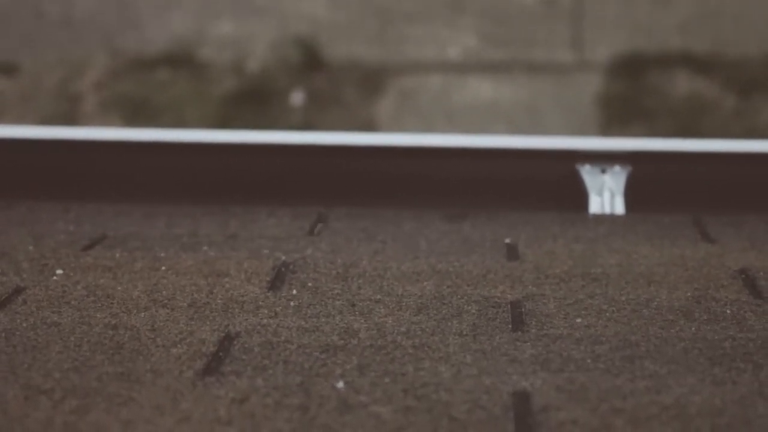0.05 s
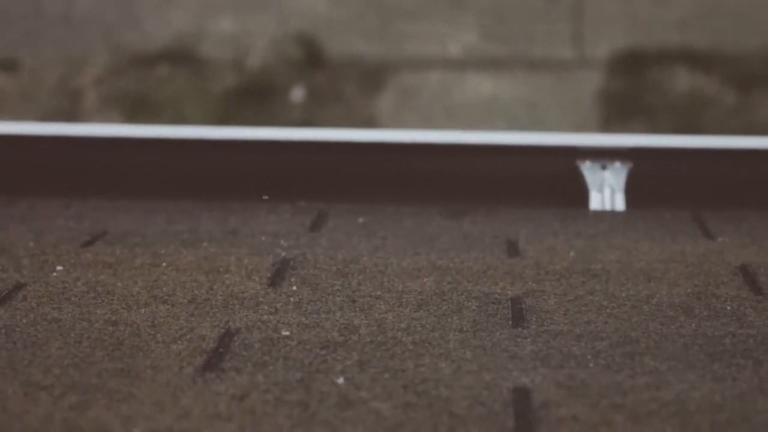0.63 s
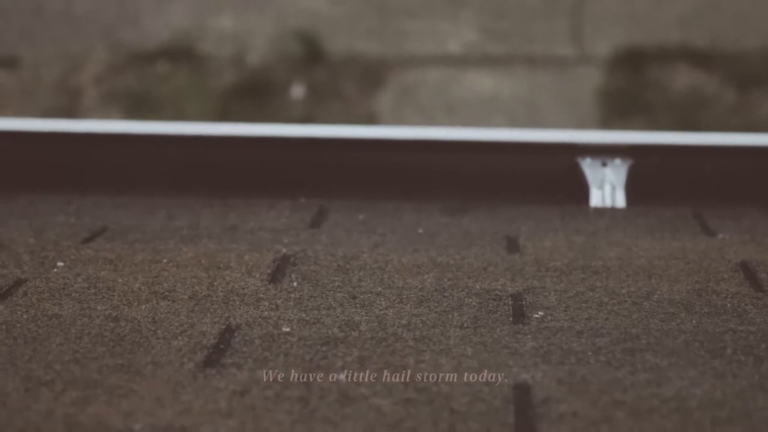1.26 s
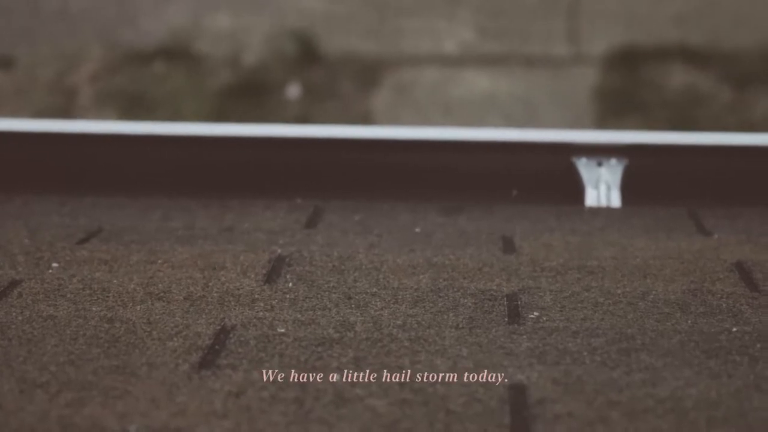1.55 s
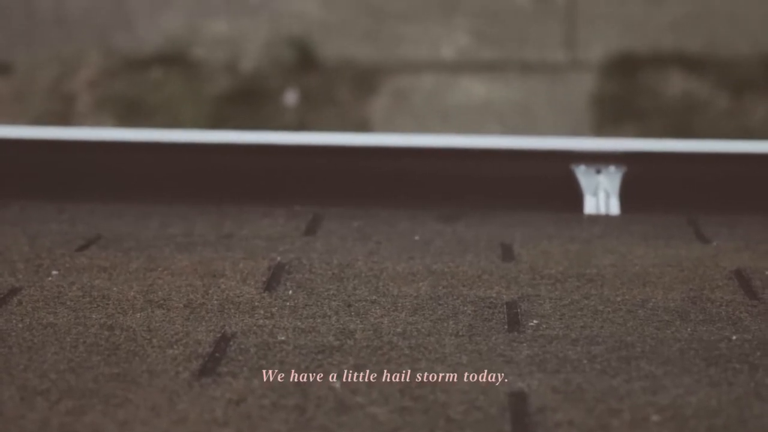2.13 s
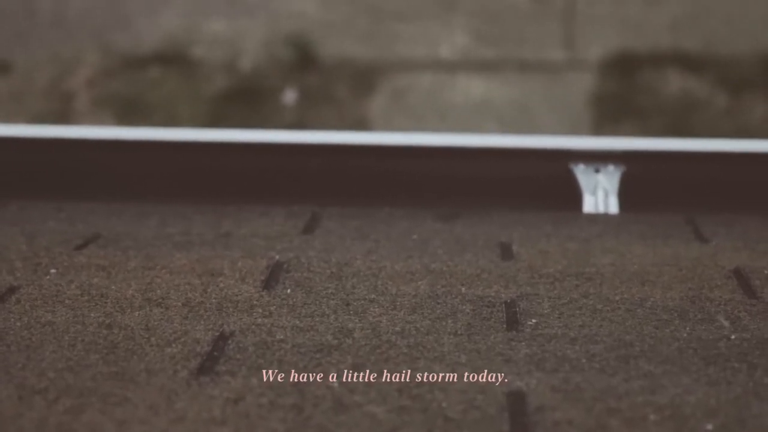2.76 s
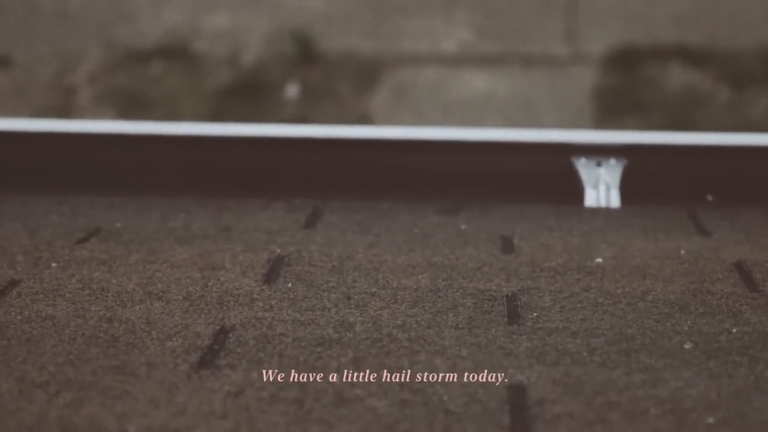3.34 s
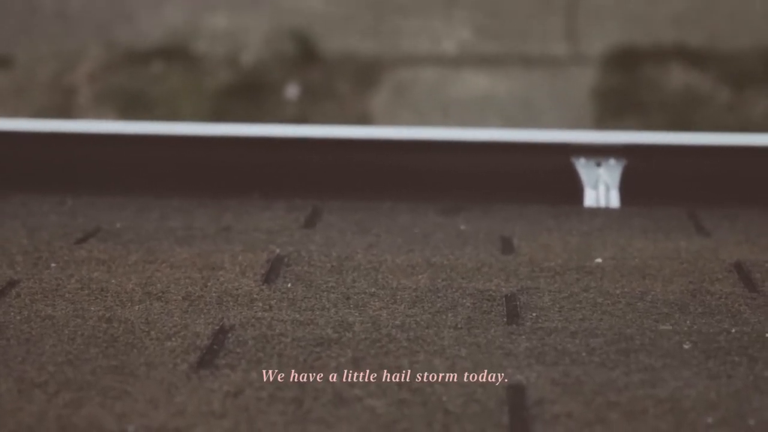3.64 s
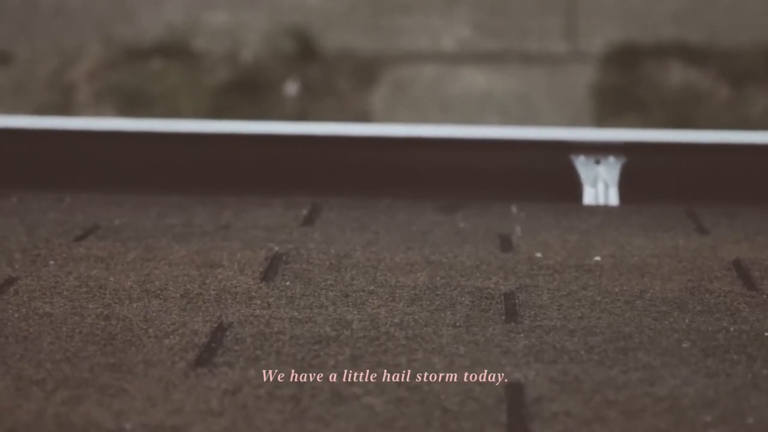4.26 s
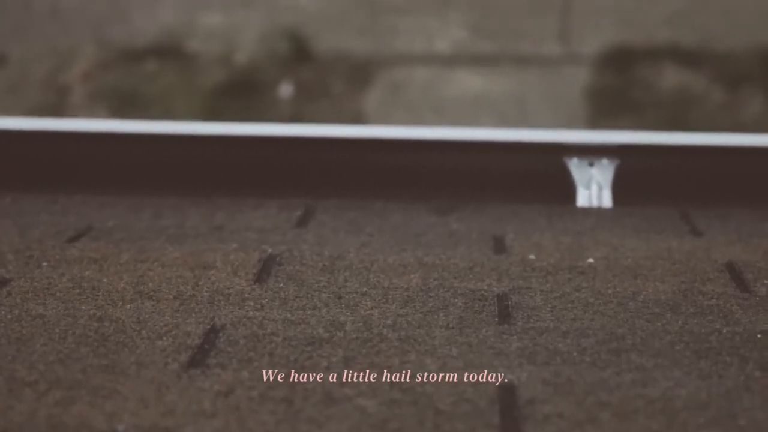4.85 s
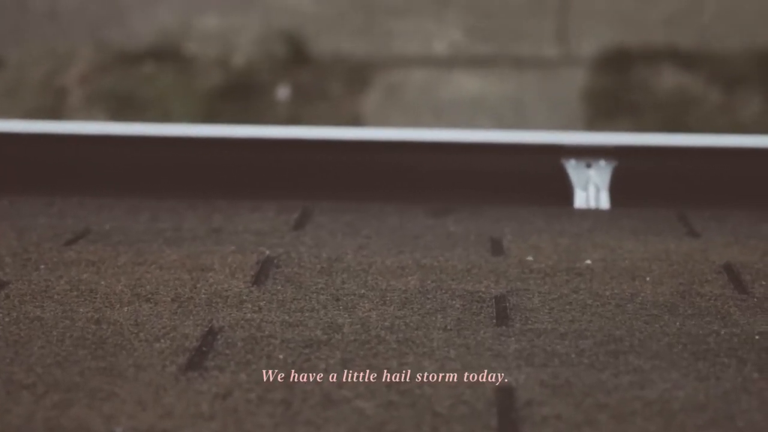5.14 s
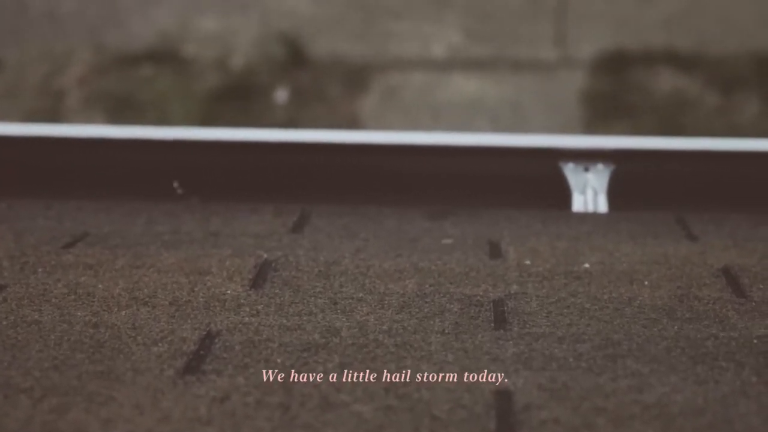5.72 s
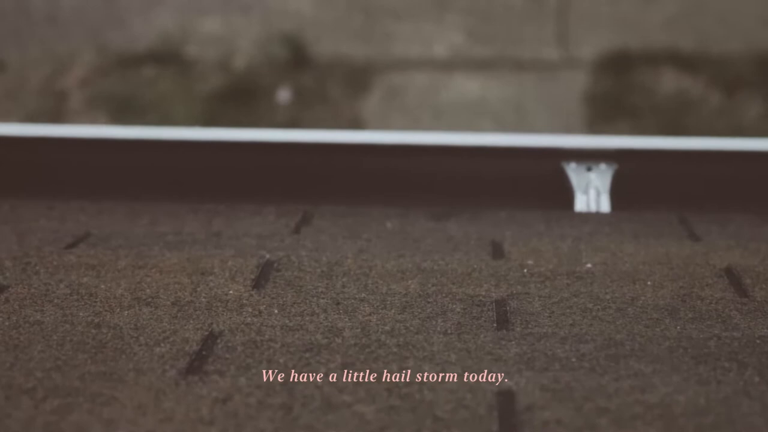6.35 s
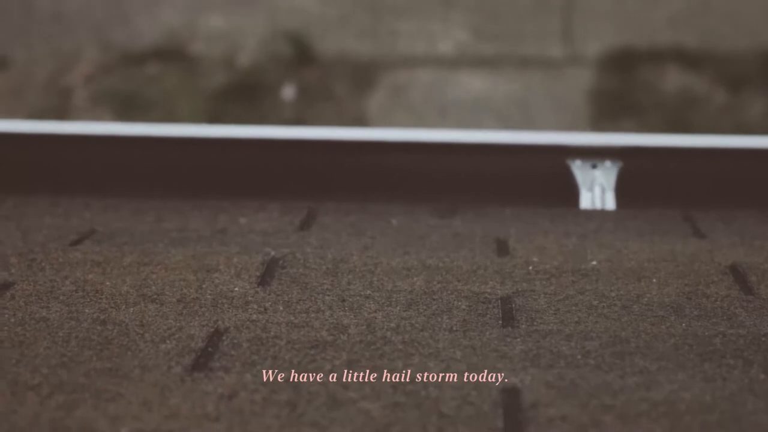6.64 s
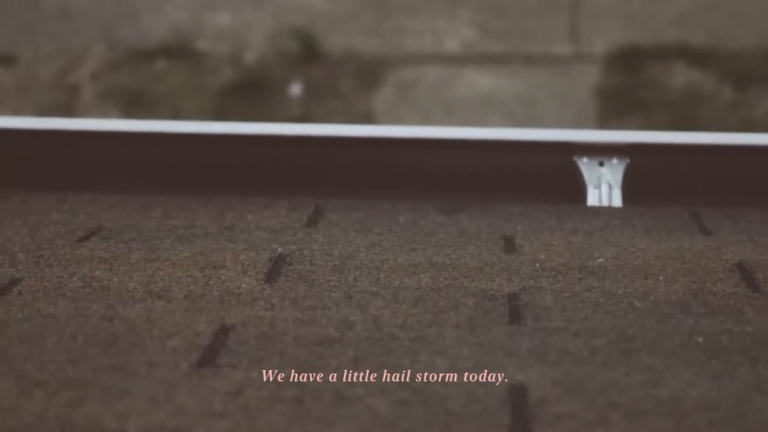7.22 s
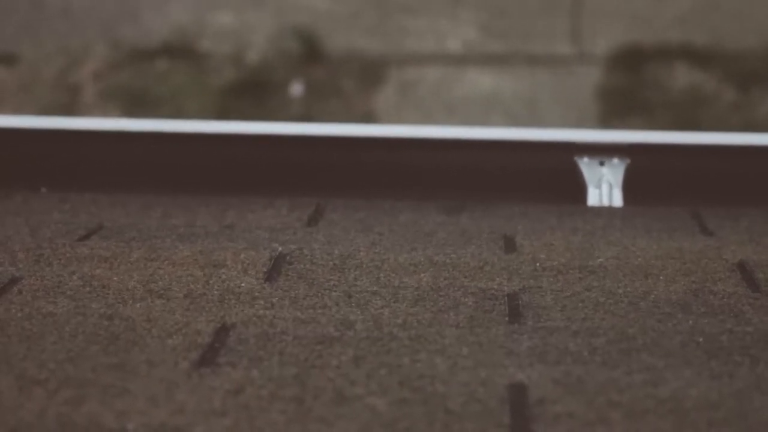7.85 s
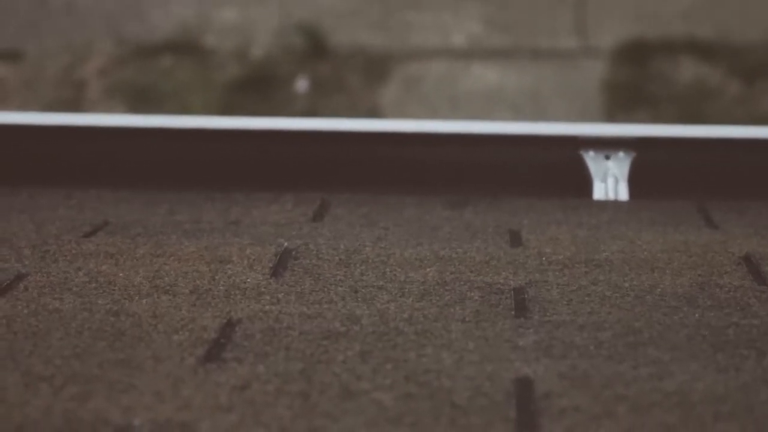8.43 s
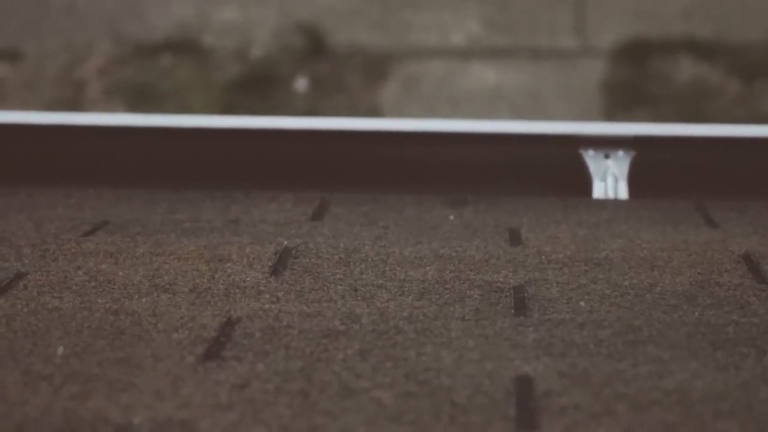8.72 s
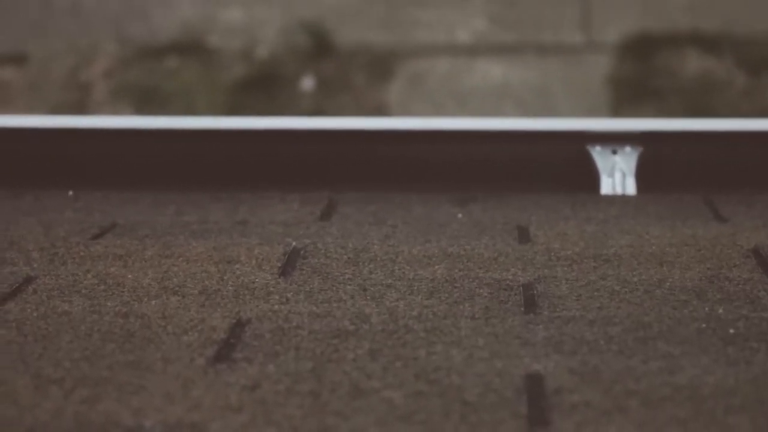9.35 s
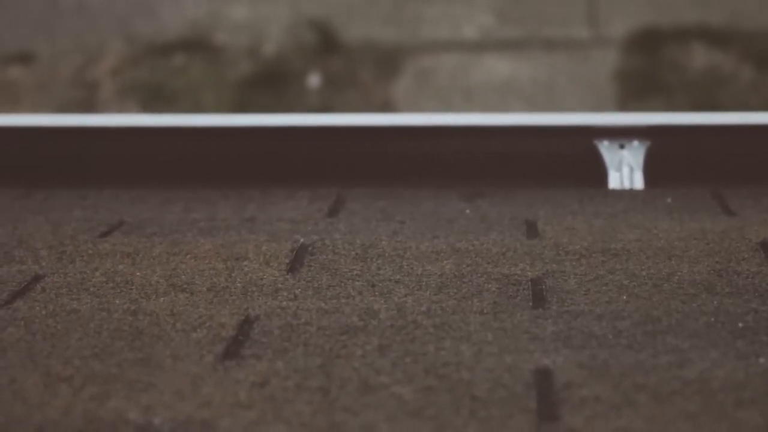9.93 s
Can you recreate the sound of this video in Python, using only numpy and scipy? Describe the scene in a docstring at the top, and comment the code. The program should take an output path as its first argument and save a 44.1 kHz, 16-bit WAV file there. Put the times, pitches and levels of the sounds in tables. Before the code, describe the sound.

Small hail and rain tick and crack on a shingle roof, with faint gutter plinks over a soft hiss and low hum.

```python
"""Rain and small hail on a shingle roof.

Near pellets crack, shatter and thud on the deck: noise bursts coloured by the shingles.
Countless farther pellets and drops merge into patter and a wet hiss that follow the shower's strength.
Drops ring a metal gutter and plink in its water. A low hum wavers underneath."""
import sys
import numpy as np
from scipy import signal
from scipy.fft import rfft, irfft, next_fast_len
from scipy.io import wavfile
from scipy.ndimage import uniform_filter1d

SR = 44100
rng = np.random.default_rng(int(sys.argv[2]) if len(sys.argv) > 2 else 0)


def waveform_to_disk(signal):
    """Save audio, clipped to [-1, 1], as 16-bit WAV at the path in sys.argv[1]."""
    frames = np.transpose(np.atleast_2d(signal))
    scaled = np.clip(frames, -1, 1) * 32767
    samples = np.round(scaled).astype(np.int16)
    wavfile.write(sys.argv[1], SR, samples)


N = 440118
HIT_SAMPLES, LEAD_SAMPLES = 2048, 96  # one hit, and the silence it opens with
HIT_HZ = np.fft.rfftfreq(HIT_SAMPLES, 1 / SR)
AGE_S = (np.arange(HIT_SAMPLES) - LEAD_SAMPLES) / SR
SIDES = np.array([[1], [-1]])  # left, right


def undb(db):
    return 10 ** (np.asarray(db) / 20)


def at_rms(x, db):
    return x * undb(db) / np.sqrt(np.mean(x ** 2))


def curve(points, hz):
    """Read (Hz, value) points on a log-frequency axis."""
    knots_hz, values = np.transpose(points)
    return np.interp(np.log(hz + 1), np.log(knots_hz), values)


def filtered(x, kind, edge_hz):
    return signal.sosfilt(signal.butter(2, edge_hz, kind, fs=SR, output="sos"), x)


def resonate(x, hz, width_hz):
    return signal.lfilter(*signal.iirpeak(hz, hz / width_hz, fs=SR), x)


def minimum_phase(gains_db):
    """The response with these gains that rings only after the blow."""
    cepstrum = irfft(np.log(undb(gains_db)))
    return np.exp(rfft(cepstrum * (1 + np.sign(np.fft.fftfreq(HIT_SAMPLES)))))


def stereo_spectra(pair, hz):
    """Mix two unrelated spectra into left and right: alike in the bass, apart in the treble."""
    # Each row: frequency in Hz, left-right correlation.
    likeness = [(60, 0.84), (170, 0.82), (390, 0.41), (800, 0.68), (1300, 0.68), (2300, 0.51), (4000, 0.75),
                (5600, 0.31), (6600, 0.26), (8400, -0.063), (11500, 0.2), (16000, -0.062)]
    correlation = curve(likeness, hz)
    mid = np.sqrt((1 + correlation) / 2) * pair[..., :1, :]
    side = np.sqrt((1 - correlation) / 2) * pair[..., 1:, :]
    return mid + SIDES * side


def stereo_field(pair, colour=None):
    """Two unrelated signals as left and right, with optional (Hz, dB) colour."""
    size = next_fast_len(N)
    hz = np.fft.rfftfreq(size, 1 / SR)
    gain = 1 if colour is None else undb(curve(colour, hz))
    return irfft(stereo_spectra(rfft(pair, size), hz) * gain, size)[:, :N]


def wander(rate_hz):
    """Smoothed random steps, spread near 1."""
    hold = int(SR / rate_hz)
    steps = rng.standard_normal(512)[np.arange(N) // hold % 512]
    return np.sqrt(2) * uniform_filter1d(uniform_filter1d(steps, hold), hold)


def drops(per_s, spread_db):
    """Randomly timed impulses of uneven size."""
    return (rng.random(N) < per_s / SR) * undb(spread_db * np.clip(rng.standard_normal(N), -2, 2))


def scattered_times(count):
    """Jittered, evenly spread starts in seconds."""
    return (np.arange(count) + 2 * rng.random(count)) / count * N / SR


def fade(decay_s, delay_s=0):
    return (AGE_S >= delay_s) * np.exp(-np.abs(AGE_S - delay_s) / decay_s)


def hum(tilt_db=0.75):
    """A low wavering hum, leaning right: noise in a few narrow resonances."""
    # Each row: centre in Hz, width in Hz, level in dB.
    resonances = [(60.3, 22, -69.5), (97.5, 19, -62), (114.6, 16.3, -63), (133, 36, -66.5),
                  (164.5, 30.5, -65.5), (244.3, 14, -71)]
    out = 0
    for hz, width_hz, db in resonances:
        band = filtered(rng.standard_normal((2, N)), "band", [hz - width_hz / 2, hz + width_hz / 2])
        out = out + at_rms(band, db)
    return stereo_field(out) * undb(-tilt_db * SIDES)


def mist(db=-53.5, edge_hz=12500):
    """The finest droplets merge into a smooth sizzle."""
    return at_rms(filtered(rng.standard_normal((2, N)), "high", edge_hz), db)


def wash(db=-45, drops_per_s=1200, splash_s=0.0054, swell_db=0.46):
    """Distant drops, each a tiny splash, overlap into a grainy hiss."""
    # Splash spectrum. Each row: frequency in Hz, gain in dB.
    colour = [(200, -5.5), (420, -6), (560, -5.5), (720, -1), (980, -3), (1100, -2.5), (1250, -4.5),
              (2000, -3), (2600, -1), (5000, -4), (8000, -6.5), (12000, -10), (15000, -43)]
    impacts = drops(drops_per_s, spread_db=6.0)
    power = signal.lfilter([1], [1, -np.exp(-2 / (splash_s * SR))], impacts ** 2)
    splashes = np.sqrt(power + 1e-18) * rng.standard_normal((2, N))
    splashes = filtered(splashes, "high", edge_hz=150)  # such small drops make no bass
    return at_rms(stereo_field(splashes, colour), db) * undb(swell_db * wander(rate_hz=2.84))


def gutter(ring_db=-56.5, drops_per_s=25, plink_s=0.01, plink_gain_db=-1.5, splash_mix=0.88):
    """Drops ring the modes of the metal trough; the biggest plink in its water."""
    # Trough modes. Each row: frequency in Hz, width in Hz, relative level in dB.
    modes = [(516, 15, -10.5), (660, 54, -3.5), (787, 280, 1.5), (874, 96, -4.5), (1100, 23, -1.5),
             (2080, 72, -1)]
    # Biggest drops. Each row: start in seconds, level in dB, pitch in Hz.
    plinks = [(1.237, -37.5, 864), (2.468, -35, 846), (2.825, -36, 1205), (3.255, -36, 880),
              (4.071, -36, 713), (4.454, -40, 697), (6.264, -38, 693), (7.223, -40.5, 690),
              (7.442, -42, 1110), (7.512, -42, 867), (9.284, -39.5, 680), (9.65, -41, 694),
              (9.741, -41, 995)]
    ring = 0
    for hz, width_hz, db in modes:
        impacts = np.array([drops(drops_per_s, spread_db=4.5) for _ in range(2)])
        ring = ring + undb(db) / np.sqrt(width_hz) * resonate(impacts, hz, width_hz)
    out = at_rms(stereo_field(ring), ring_db)
    for start_s, db, hz in plinks:
        start = int(start_s * SR) - LEAD_SAMPLES
        splash = at_rms(resonate(rng.standard_normal((2, HIT_SAMPLES)), hz, hz / 2), 0)
        tone = np.sin(2 * np.pi * hz * AGE_S) + splash_mix * splash
        envelope = fade(plink_s) - fade(0.00025)
        out[:, start:start + HIT_SAMPLES] += undb(db + plink_gain_db) * envelope * tone
    return out


def shingle_response(thud_db, treble_db, ripple_db, ripple_step_hz=450):
    """One filter per hit: every spot on the roof has resonances of its own."""
    # Struck shingle. Each row: frequency in Hz, gain in dB.
    shingle = [(150, -20), (400, -17), (680, -5), (950, -7), (1350, -5.5), (2000, -2), (2400, 0),
               (3300, -1.5), (4300, -2), (5300, -3.5), (7000, -3.5), (8600, -6.5), (11500, -8),
               (15700, -13.5)]
    knots = rng.standard_normal((len(thud_db), 128))
    spot = np.array([np.interp(HIT_HZ / ripple_step_hz, np.arange(128), k) for k in knots])[:, None]
    ripple = ripple_db * spot * curve([(900, .5), (2200, 1), (7000, 1), (12000, .5)], HIT_HZ)
    low_shelf = thud_db * curve([(1300, 1), (2100, 0)], HIT_HZ)
    high_shelf = treble_db * curve([(4500, 0), (7500, 1)], HIT_HZ)
    return minimum_phase(curve(shingle, HIT_HZ) + ripple + low_shelf + high_shelf)


def pellets(start_s, db, thud_db, treble_db, crumble_s, pan_db, crack, rise_s=0.00047, crack_s=0.00015,
            spray_db=-21, spray_s=0.053, thud_s=0.02, thud_hz=1500, ripple_db=2.0):
    """Each pellet cracks, crumbles and sprays while the deck thuds; pan_db is left minus right."""
    columns = np.array(np.broadcast_arrays(db, thud_db, treble_db, crumble_s, pan_db))
    db, thud_db, treble_db, crumble_s, pan_db = columns[:, :, None, None]
    count = len(start_s)
    force, lag = rng.random((count, 2, 1, 1)).swapaxes(0, 1)
    grit, boards = rng.standard_normal((2, count, 2, HIT_SAMPLES))
    crumble_s = np.maximum(crumble_s, 1e-3)
    crumble = (fade(crumble_s) + undb(spray_db) * fade(spray_s)) * (1 - fade(rise_s))
    # hard contact is sharpest in loud, brief hits
    sharpness = np.sqrt(np.median(crumble_s) / crumble_s * undb(db - np.max(db)))
    contact = crack * (.5 + force / 2) * sharpness * fade(crack_s, delay_s=0.0012 * lag ** 2)
    burst, deck = (e / np.linalg.norm(e, axis=-1, keepdims=True)
                   for e in (crumble + contact, fade(thud_s)))
    deck_share = 1 / (1 + (HIT_HZ / thud_hz) ** 4)
    spectra = rfft(grit * burst) * np.sqrt(1 - deck_share) + rfft(boards * deck) * np.sqrt(deck_share)
    spectra = stereo_spectra(spectra, HIT_HZ) * shingle_response(thud_db, treble_db, ripple_db)
    # db sets the mid-band energy, as an rms over 10 ms
    mid_band = spectra[..., (HIT_HZ > 1600) & (HIT_HZ < 6000)]
    energy = 2 * np.sum(np.abs(mid_band) ** 2, axis=-1, keepdims=True) / HIT_SAMPLES
    hits = irfft(spectra / np.sqrt(energy / (.01 * SR))) * undb(db + SIDES * pan_db / 2)
    out = np.zeros((2, N + 2 * HIT_SAMPLES))
    for start, hit in zip(np.clip(start_s * SR, 0, N).astype(int), hits):
        out[:, start:start + HIT_SAMPLES] += hit
    return out[:, LEAD_SAMPLES:LEAD_SAMPLES + N]


def patter(count=480):
    """Small pellets all over the roof, their attacks softened by distance."""
    size, thud, treble, length, side = 2 * rng.random((count, 5)).T - 1
    return pellets(scattered_times(count), db=-46 + 6.5 * size, thud_db=3 + 2.5 * thud,
                   treble_db=1.5 + 2.5 * treble, crumble_s=0.0033 * 2 ** length, pan_db=3 * side,
                   crack=.9, rise_s=0.0031)


def ice_chips(count=130):
    """Chips of ice bounce on the shingles with tiny dry ticks."""
    size, side, when = rng.random((count, 3)).T
    return pellets(when * N / SR, db=-48 + 2 * size, thud_db=-7, treble_db=5.5, crumble_s=0.0017,
                   pan_db=6 * (2 * side - 1), crack=6.4, spray_db=-35)


def small_hail(count=120):
    """Light pellets land nearby; the smaller they are, the shorter and brighter they tick."""
    size, thud, side = 2 * rng.random((count, 3)).T - 1
    return pellets(scattered_times(count), db=-40.5 + 2 * size, thud_db=-3.5 + 7.5 * thud,
                   treble_db=-1.5 - 7.5 * size, crumble_s=0.0032 * 2 ** (2 * size / 3),
                   pan_db=7.5 * side, crack=2.6, rise_s=0.0012)


def big_hail(crumble_s=0.0045, halving_db=9, delay_s=0.0007):
    """The biggest pellets: the cleaner the bounce, the shorter the crumble."""
    # Each row: start in seconds, then snap, knock, thud, sizzle and left minus right, all in dB.
    # Knock sets the level; the higher snap is relative to knock, the shorter and crisper the hit.
    strikes = [(0.154, -26, -37, -46, -37, -1.0), (0.4748, -13, -31.5, -47.5, -28, 0),
               (0.7514, -38, -32, -43, -33, 0.5), (0.829, -7, -27, -40, -34, 3.0),
               (0.8474, -27, -30.5, -42, -30, -3), (0.8847, -21, -26, -41, -29, 1),
               (0.9722, -17, -34, -43, -34, 2.0), (1.062, -18, -32, -48, -29, 1.0),
               (1.126, -17, -34, -45, -30.5, -2), (1.1905, -31, -30.5, -45, -32, 0.5),
               (1.257, -18, -31, -45, -31, -2), (1.4584, -19, -31.5, -48, -30, 5),
               (1.5649, -8, -26.5, -39, -26, 2.5), (1.8095, -21, -37, -51, -41, 3),
               (1.8418, -17.5, -27.5, -40.5, -22.5, 1), (1.915, -11, -32.5, -45, -34, 4),
               (1.9894, -19, -35.5, -45, -37, 0.0), (2.0955, -1, -31.5, -38.5, -20.5, -3),
               (2.1024, -14, -31, -44.5, -37, 5), (2.3575, -16, -34, -46, -38, 4),
               (2.4633, -18, -33.5, -40, -28, 2.0), (2.577, -21, -33.5, -42.5, -40, 2.0),
               (2.8228, -23, -39, -42, -44, 0.5), (2.868, -20, -38, -51, -36, 3),
               (2.8818, -23, -39, -52, -33, 2), (2.8903, -18, -35, -47, -26.5, -3),
               (2.9861, -19, -29.5, -38.5, -31, 0), (3.042, -32, -35, -44, -30, 1.5),
               (3.0634, -21, -31.5, -49, -29.5, 2.5), (3.1832, -25, -34, -48, -36, 0),
               (3.27, -28, -31.5, -39, -37, 1.0), (3.427, -7, -30.5, -41, -29, -5),
               (3.5813, -26, -36, -38, -33, -1.5), (3.696, -11, -30, -41, -23, -0.5),
               (3.7616, -20, -32, -55, -27, 2.5), (4.0224, -17, -31, -37.5, -22, 1.5),
               (4.2679, -20, -30.5, -40.5, -30, -2.0), (4.3246, -9, -30.5, -42, -20.5, 1),
               (4.5044, -22, -32, -41, -32, -1.5), (4.5316, -20, -38, -42, -35, 2),
               (4.594, -24, -36.5, -53, -41, 0.5), (4.6067, -25, -31, -46, -32, 0),
               (4.6323, -16, -35, -47, -28, -2), (4.811, -19, -37, -51, -33, 5),
               (4.8696, -9, -24.5, -38, -21, 2.5), (4.9507, -14, -28.5, -51, -30, -1.0),
               (5.005, -20, -31, -41.5, -33, 0), (5.0903, -20, -33, -40.5, -29, 1.5),
               (5.1786, -24, -32, -41, -31, 2), (5.3283, -25, -33, -38, -36, 2.0),
               (5.3465, -19, -31.5, -47, -31, 0), (5.6967, -24, -35, -47, -34, 1.0),
               (5.9664, -23, -35, -49, -43, -1), (6.121, -18, -34, -44, -31, 1),
               (6.2494, -26, -42, -37.5, -51, -3), (6.4798, -13, -32.5, -51, -39, 2.0),
               (6.548, -30, -31, -43, -33, 0.0), (6.5614, -13, -26.5, -41, -27.5, 3),
               (6.6118, -19, -33, -55, -33, 1), (6.6855, -15, -31.5, -44, -26, -0.5),
               (6.9125, -22, -33, -49, -27.5, -1), (7.079, -19, -33.5, -40, -33, 0.5),
               (7.1, -14, -29.5, -50, -33, 0.5), (7.194, -21, -31, -36.5, -33, 1.5),
               (7.4525, -19, -35, -42, -33, 1.5), (7.6091, -17, -37.5, -52, -37, 0.5),
               (7.7043, -24, -33.5, -44, -31, 0), (7.755, -23, -30.5, -48, -44, 4),
               (7.8374, -22, -33, -42, -30, 2.0), (7.9157, -26, -39, -52, -28.5, -3),
               (8.0021, -19, -32, -51, -35, 2.0), (8.2376, -15, -31.5, -39, -34, 1.0),
               (8.4564, -15, -32, -40.5, -35, -1), (8.6143, -15, -35, -44, -35, 1.5),
               (8.8613, -39, -37, -35.5, -39, 2), (8.8907, -5, -28.5, -37, -30, 2.0),
               (9.1955, -22, -33, -48, -36, -2), (9.3113, -19, -32.5, -40, -31, -0.5),
               (9.563, -28, -29.5, -42, -30, 1), (9.663, -14, -30.5, -39, -33.5, 1.0),
               (9.845, -19, -34.5, -44, -31, -1.0), (9.8843, -16, -31, -38, -37, 0.5),
               (9.9441, -21, -30, -37, -28, 0.5)]
    start_s, snap_db, knock_db, thud_db, sizzle_db, pan_db = np.transpose(strikes)
    clean_db, heavy_db, bright_db = (db - knock_db - np.median(db - knock_db)
                                     for db in (snap_db, thud_db, sizzle_db))
    return pellets(start_s + delay_s, db=knock_db - 3, thud_db=heavy_db - 2, treble_db=bright_db - 0.66,
                   crumble_s=crumble_s * 2 ** (-clean_db / halving_db), pan_db=pan_db,
                   crack=8.0, crack_s=0.0001, rise_s=0.001, spray_db=-27, ripple_db=3.5)


def scene():
    """The shower's strength scales all but the big hail, the gutter and the hum."""
    # Each row: time in seconds, shower strength in dB (used relative to the mean).
    shower = [(0.0, -42.5), (3.17, -43.5), (3.56, -40), (3.89, -43), (5.03, -42), (5.42, -43.5),
              (6.53, -42.5), (6.67, -44.5), (7.53, -42), (9.15, -44), (9.39, -42), (9.98, -45)]
    time_s, shower_db = np.transpose(shower)
    strength = undb(np.interp(np.arange(N) / SR, time_s, shower_db - np.mean(shower_db)))
    roof = big_hail() + strength * (small_hail() + ice_chips() + patter() + wash() + mist())
    return roof + gutter() + hum()


def record(dry, bottom_hz=31, top_hz=15720):
    """Soft-clip, thin the deepest bass, cut the top."""
    thinned = filtered(np.tanh(dry), "high", bottom_hz)
    return signal.sosfilt(signal.ellip(10, .2, 70, top_hz, fs=SR, output="sos"), thinned)


dry = scene()
out = record(dry)
waveform_to_disk(out)
```